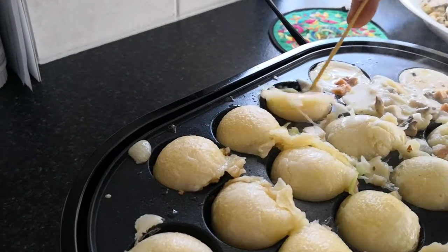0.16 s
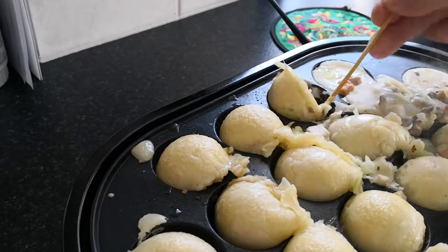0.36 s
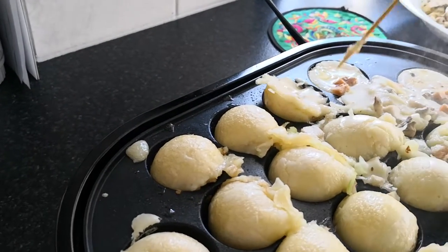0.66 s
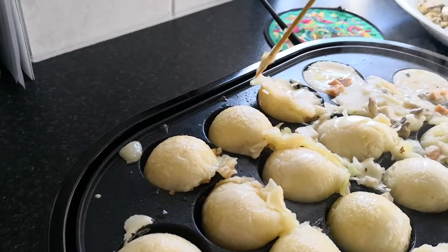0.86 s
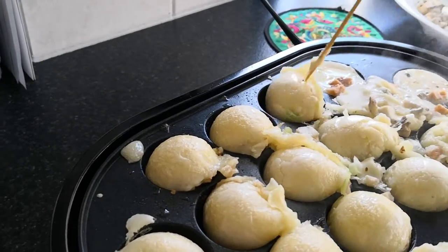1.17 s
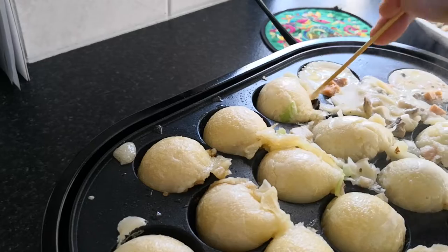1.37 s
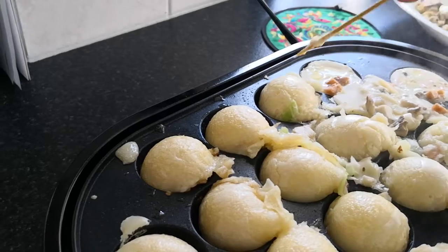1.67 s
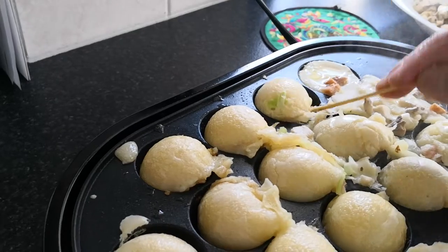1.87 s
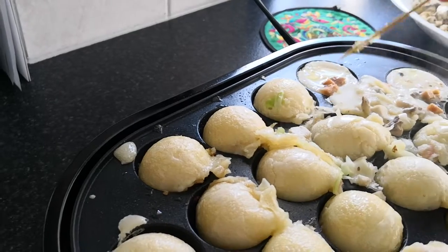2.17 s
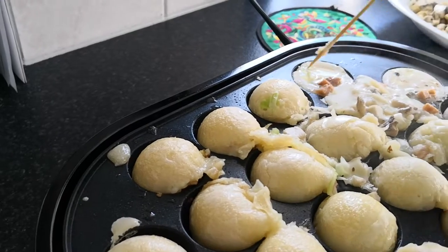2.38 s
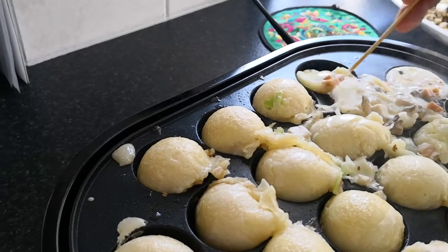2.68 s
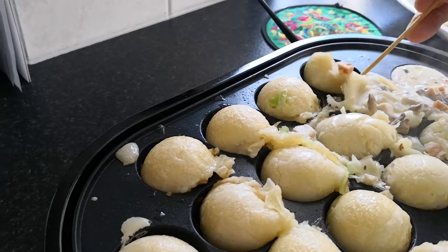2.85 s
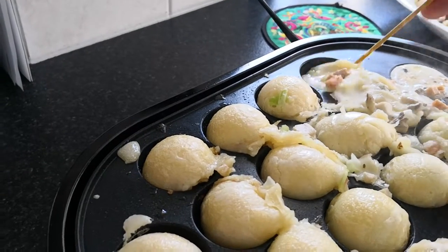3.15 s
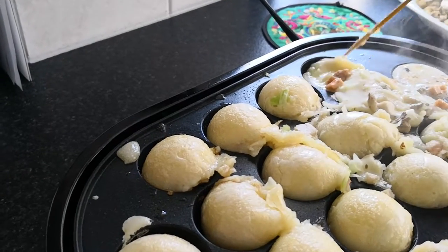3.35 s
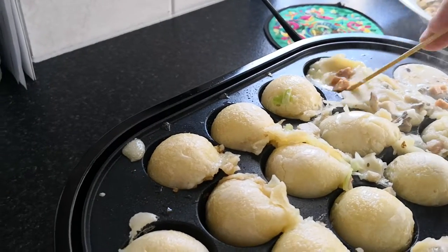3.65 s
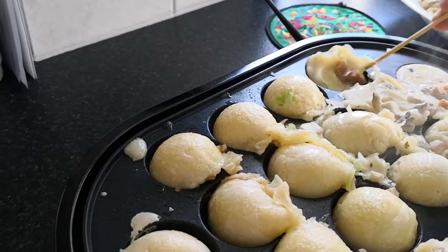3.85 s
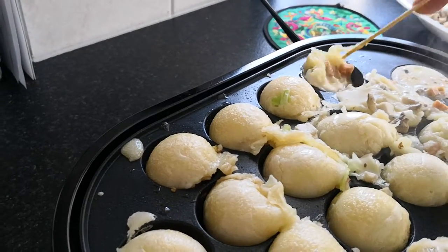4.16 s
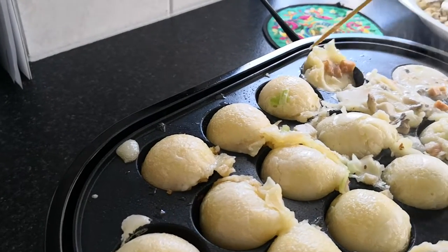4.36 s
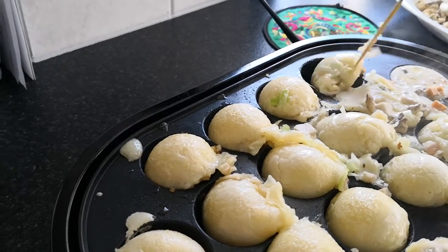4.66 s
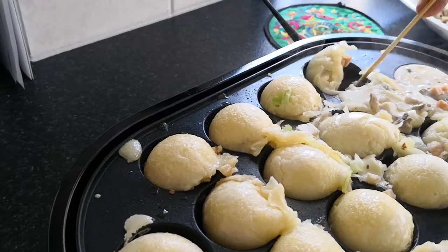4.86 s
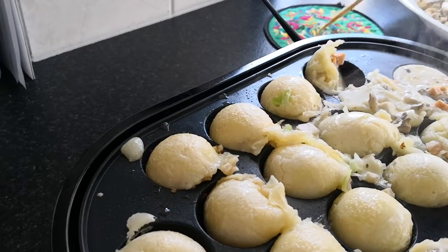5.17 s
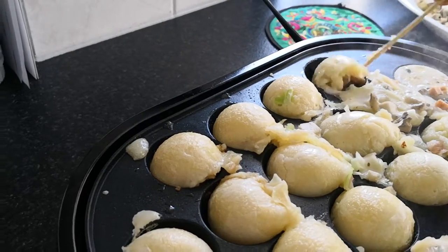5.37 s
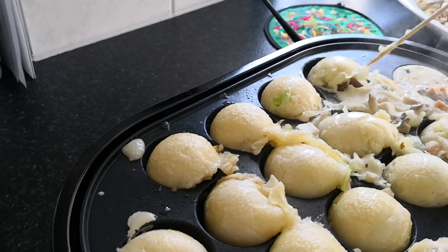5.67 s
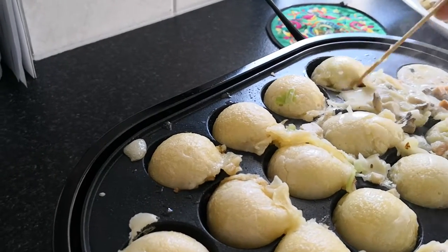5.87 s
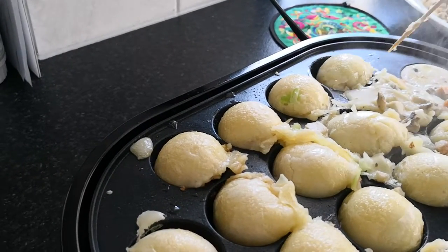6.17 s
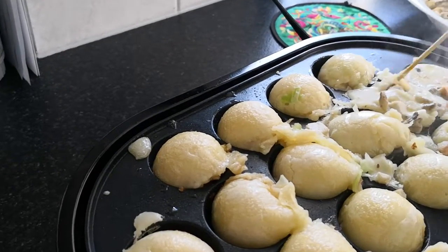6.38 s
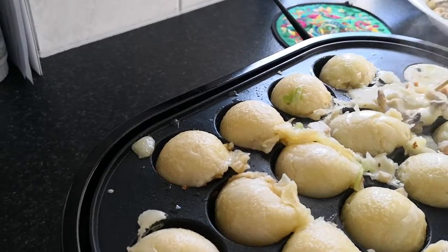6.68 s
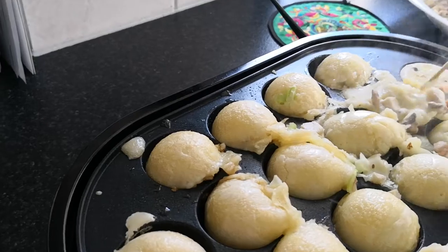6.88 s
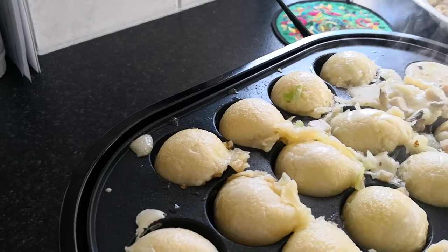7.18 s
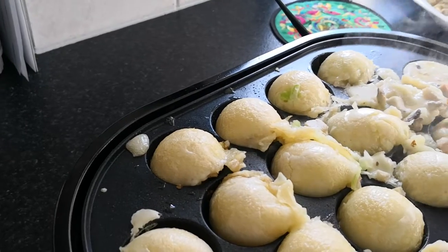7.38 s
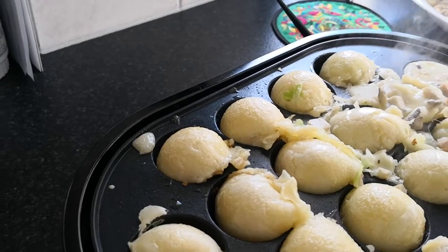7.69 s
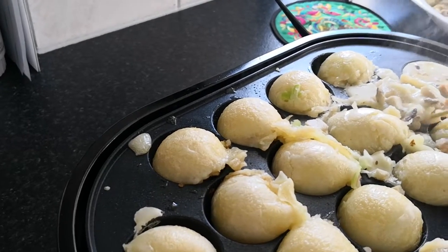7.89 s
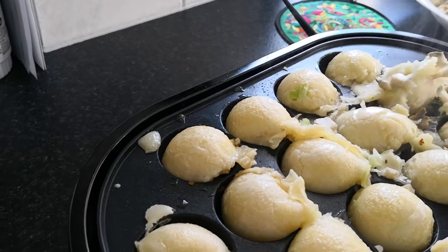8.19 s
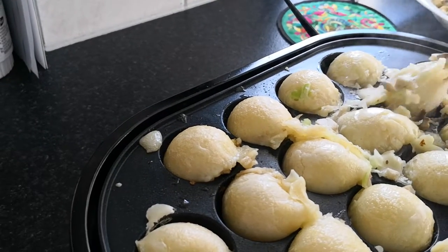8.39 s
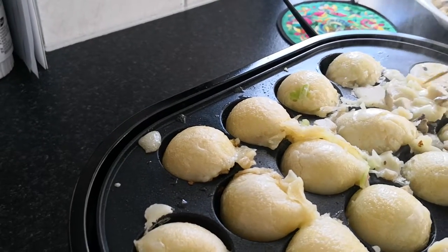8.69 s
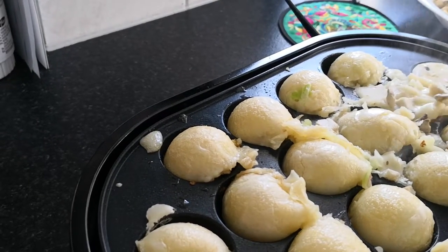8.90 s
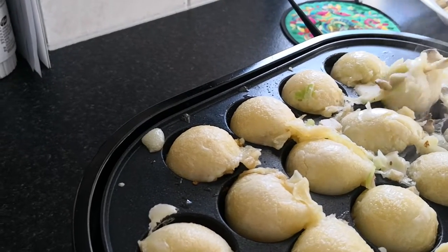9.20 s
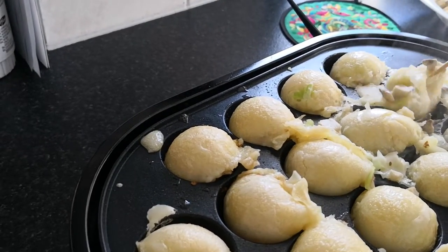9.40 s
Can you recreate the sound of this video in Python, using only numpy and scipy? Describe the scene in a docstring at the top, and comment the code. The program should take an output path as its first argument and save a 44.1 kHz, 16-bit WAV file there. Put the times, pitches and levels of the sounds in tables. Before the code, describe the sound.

A close stereo take of frying dough balls, slightly to the right: a steady hiss of fat, irregular crackling, and short pops, some bright and ticking, others duller. The sizzle flares and sinks in quick swells, with an especially wet flare just before seven seconds. Short hard room echoes surround it. Underneath, soft low vehicle rumble and wavering engine drones grow late on.

```python
"""A small hard kitchen: batter fries in the hollows of a hot iron plate, close by and a little to the right
of a small two-port microphone. Bubbles bursting in the fat are rung clicks: a dense fizz and a looser crackle.
Single pops are short swings with a bell-shaped spectrum. Random echoes make the room.
From outside come traffic, as three bands of filtered noise, and engine drones, as wavering sines."""
import sys
import numpy as np
from scipy import signal
from scipy.fft import rfft, irfft
from scipy.io import wavfile

SR = 44100
rng = np.random.default_rng(int(sys.argv[2]) if len(sys.argv) > 2 else 0)


def persist_wave(psi):
    """Save psi, clipped to +-1, as 16-bit WAV."""
    counts = np.round(np.clip(psi, -1, 1) * 32767).astype(np.int16)
    wavfile.write(sys.argv[1], SR, np.atleast_2d(counts).T)


def undo_db(level):
    """Turn decibels back into plain size, where 20 dB means ten times bigger."""
    steps = np.asarray(level, float) / 20
    return 10 ** steps


N = 420713   # samples
LEFT_LAG_S, LAG_SPREAD_S = .00008, .00006   # the left port is farther from the plate


def rms_one(x):
    """Scale to rms 1."""
    return x / np.sqrt(np.mean(x ** 2) + 1e-20)


def in_time(rows):
    """Columns of a curve at every sample; the first column is time in s."""
    s, *columns = np.transpose(rows)
    return [np.interp(np.arange(N) / SR, s, column) for column in columns]


def at_hz(points, hz, axis=1):
    """A spectrum's dB at given pitches, straight lines over log frequency."""
    points = np.array(points)
    return np.interp(np.log(np.maximum(hz, 1)), np.log(points[:, 0]), points[:, axis])


def drift(rate):
    """Slow random wander of spread about 1: noise through two equal one-pole low-passes, every 40 samples."""
    r = np.exp(-80 * np.pi * rate / SR)
    slow = signal.lfilter([1], [1, -2 * r, r * r], rng.standard_normal(N // 40 + 2002))[2000:]
    return np.interp(np.arange(N) / 40, np.arange(len(slow)), rms_one(slow - slow.mean()))


def causal(points, axis=1, size=8192):
    """Minimum-phase impulse response of a spectrum, by folding its cepstrum."""
    hz = np.arange(size // 2 + 1) * SR / size
    cepstrum = irfft(np.log(undo_db(at_hz(points, hz, axis=axis))))
    cepstrum[1:size // 2] *= 2
    cepstrum[size // 2 + 1:] = 0
    return irfft(np.exp(rfft(cepstrum)))[:size // 2]


def convolve(x, responses):
    """Each channel through its own response."""
    return signal.oaconvolve(x, responses, axes=-1)[..., :N]


# Vigour of the steady frying, before the trims in frying(): start_s [s], large_bubbles_db [dB], small_bubbles_db [dB]
SIMMER = [(0, -50, -50.5), (2.3, -49, -51), (3.7, -50.5, -51.5), (6.2, -49, -51.5), (8, -50, -51),
          (9.54, -49, -50)]
# Wet batter meets hot iron and the fizz surges:
# crest_s [s], length_s [s, nominal], large_bubbles_lift_db [dB], small_bubbles_lift_db [dB]
SURGES = [(0.003, .15, 2.5, 3), (0.44, .3, 4, 7), (1.323, .55, 3, 8.5), (1.921, .25, 1, 7),
          (2.07, 0.19, 5, 0), (2.309, .18, 0, 4.5), (2.851, .35, 2.5, 3.5), (3.329, .4, 0, 2),
          (4.033, .35, -0.5, 5), (4.736, 0.136, 5, 5), (5.05, .3, -1, 3), (5.52, .35, 1, 5),
          (5.923, .2, 1.5, 2), (6.522, .18, 0, 3.5), (6.84, .3, 7, 8), (7.502, .5, 1, 4),
          (8.022, 0.2497, 1.5, .5), (8.25, .3, -0.5, 3.5), (8.52, .4, 1.5, 3), (9.261, .3, 0.5, 4),
          (9.53, .15, 0, 3)]
SURGE_RISE_SHARE, SURGE_ROUNDNESS = .55, 1.5   # share of the length spent rising; 1 = pointed crest, 2 = round


def vigour():
    """Levels in dB of large and small bubbles: steady frying, lifted by surges that rise to a crest and sink."""
    levels, t = np.array(in_time(SIMMER)), np.arange(N) / SR
    for crest_s, length_s, large_db, small_db in SURGES:
        first = max(round((crest_s - 2 * length_s) * SR), 0)
        near = slice(first, round((crest_s + 2 * length_s) * SR))
        share = np.where(t[near] < crest_s, SURGE_RISE_SHARE, 1 - SURGE_RISE_SHARE)
        away = np.abs(1.5 * (t[near] - crest_s) / (length_s * share))
        levels[:, near] += np.exp(-away ** SURGE_ROUNDNESS) * [[large_db], [small_db]]
    return levels


def bursts(per_s, spread_db, cycles, clump_db, low_hz, high_hz, count=12, largest=2.4):
    """Bubbles burst at random places on the plate, each ringing 60 dB down in some cycles; rms 1 in all."""
    rate = per_s * undo_db(clump_db * drift(30.0))   # bursts come in clumps
    at = np.flatnonzero(rng.random(N - 64) < rate[64:] / SR) + 16
    size, place, pitch, sign = rng.random((4, len(at)))
    # exponential sizes in dB, capped at the largest, of either polarity
    size = undo_db(spread_db * np.minimum(-np.log(size + 1e-9), largest)) * np.sign(sign - .5)
    place = 2 * place - 1   # -1..1 across the plate; sets lag and side
    lag = np.clip(np.round((LEFT_LAG_S + 1.7 * LAG_SPREAD_S * place) * SR), -15, 30).astype(int)
    out = np.zeros((2, N))
    for k, hz in enumerate(np.geomspace(low_hz, high_hz, count)):
        mine = (pitch * count).astype(int) == k
        clicks = np.full((2, N), 1e-18)
        np.add.at(clicks[0], (at + lag)[mine], (size * undo_db(-1.5 * place))[mine])
        np.add.at(clicks[1], at[mine], (size * undo_db(3.7 * place))[mine])
        r, w = undo_db(-60 * hz / (cycles * SR)), 2 * np.pi * hz / SR
        ringing = signal.lfilter([hz, 0, -hz], [1, -2 * r * np.cos(w), r * r], clicks)
        out += ringing * np.sqrt(hz)
    return rms_one(out)


def frying():
    """Large bubbles sound low, small ones high; each has a dense fizz and a crackle that thickens in a surge."""
    large_db, small_db = vigour()
    surge_db = small_db - np.median(small_db)
    large_surge_db = large_db - np.median(large_db)

    large_fizz = bursts(4000., 1.7, 2.52, 2.5, 690, 2930)
    large_crackle = bursts(200. * undo_db(surge_db), 6.3, 4.5, 4.0, 1020, 4400)
    small_fizz = bursts(6000., 5.6, 5.4, 2.5, 2800, 10200)
    small_crackle = bursts(260. * undo_db(surge_db), 14.0, 4.0, 4.0, 2800, 13000)
    # the finest spray follows a surge only in part
    finest = bursts(6000., 2.9, 5.3, 2.5, 7500, 12000, count=6)
    # wet batter adds middle-sized bubbles, mostly in a surge
    wet = bursts(3000., 3.7, 5.6, 2.5, 2900, 4700, count=4)
    # steam blows out from under a turned ball and rings in the hollow
    gurgle = bursts(300., 3.8, 8.3, 3.0, 1430, 2290, count=5)

    large = large_fizz + undo_db(-4.5 - 0.27 * surge_db) * large_crackle
    large = large + undo_db(-16.0 + 1.85 * large_surge_db) * gurgle
    small = small_fizz + undo_db(-7.0 - 2.3 * surge_db) * small_crackle
    small = small + undo_db(-.4 * surge_db) * finest + undo_db(-12.5 + 1.9 * surge_db) * wet
    return undo_db(large_db - 2.5) * large + undo_db(small_db - 3.5) * small


# Traffic outside: start_s [s], deep_rumble_db [dB rms], middle_db [dB rms]
TRAFFIC = [(0.0, -59, -59.5), (0.8, -62.5, -54.5), (1.15, -67, -58.5), (1.8, -56.5, -54.5),
           (2.54, -71, -59), (3.49, -56, -54), (3.79, -63, -56.5), (4.29, -59, -54.5), (5.09, -62.5, -53.5),
           (5.64, -60, -54.5), (6.63, -59.5, -58), (8.25, -52.5, -51.5), (8.4, -47, -44.5),
           (8.58, -44, -47), (8.75, -62, -52.5), (9.25, -55, -52), (9.53, -47.5, -48)]
# Colour of the rumble, before its bands are levelled: pitch_hz [Hz], density_db [dB per Hz, relative]
RUMBLE = [(15, -60), (25, -7.5), (44, -4.5), (107, -3.5), (140, -2.5), (220, -13.5), (301, -12.5),
          (366, -18), (549, -27), (900, -18.5), (1170, -30), (1980, -120)]
UPPER_DB, UPPER_FOLLOWS = -65.5, 0.33   # the upper rumble shares part of the middle's swing


def traffic():
    """Rumble through the walls, alike at both ports only in the bass; three bands swell as vehicles pass."""
    mid, side = convolve(rng.standard_normal((2, N)), causal(RUMBLE, size=16384)[None])
    high_pass = signal.butter(2, 520., "high", fs=SR, output="sos")
    side = signal.sosfilt(high_pass, side) + undo_db(-12.5) * side
    both = mid + side * [[1], [-1]]
    deep_db, middle_db = in_time(TRAFFIC)
    upper_db = UPPER_DB + UPPER_FOLLOWS * (middle_db - middle_db.mean())
    out = 0
    for db, hz, kind in [(deep_db, 125., "low"), (middle_db, [125., 240.], "band"), (upper_db, 240., "high")]:
        band = signal.sosfilt(signal.butter(3, hz, kind, fs=SR, output="sos"), both)
        out = out + undo_db(db) * rms_one(band)
    return out


def drone(rows, orders, waver_db):
    """Sines on multiples of a wavering pitch, fading to -90 dB before and after the (s, Hz, dB) rows."""
    (first_s, first_hz, _), (last_s, last_hz, _) = rows[0], rows[-1]
    hz, level_db = in_time([(first_s - .15, first_hz, -90), *rows, (last_s + .15, last_hz, -90)])
    turns = np.cumsum(hz + .5 * drift(3.43)) / SR
    out = 0
    for multiple, db in orders:
        sine = np.sin(2 * np.pi * (multiple * turns + rng.random()))
        out = out + undo_db(level_db + db + waver_db * drift(7.3)) * np.sqrt(2) * sine
    return out


# Near engine, its level: start_s [s], level_db [dB rms, before the waver]
ENGINE = [(0.0, -53), (0.35, -54), (0.5, -64), (0.97, -62), (1.4, -45.5), (1.6, -59), (1.8, -52.5),
          (2.241, -52.5), (2.44, -65), (4.99, -68), (5.41, -58.5), (6.61, -60.5), (6.78, -49.5),
          (7.23, -43), (7.76, -48), (8.11, -60), (8.41, -44), (8.579, -42.5), (9.03, -39), (9.53, -49.5)]
# Its firing pitch, lower by the end: start_s [s], pitch_hz [Hz]
ENGINE_HZ = [(0, 60.56), (.8, 59.3), (2.4, 58.87), (4.2, 56.95), (7.8, 57.58), (9.54, 54.7)]
# Its harmonics: multiple [of the firing pitch], level_db [dB against the first]
ENGINE_ORDERS = [(1, 0), (2, -27.5), (3, -17.5)]


def near_engine():
    """The firing pitch and its harmonics, read at the times of the level rows."""
    rows = [(s, np.interp(s, *np.transpose(ENGINE_HZ)), db) for s, db in ENGINE]
    return drone(rows, ENGINE_ORDERS, waver_db=1.0)


# Far drones, one list of rows each: start_s [s], pitch_hz [Hz, sounded at 0.99 of it],
# level_db [dB rms, sounded 4 dB lower]
DRONES = [
    [(.6, 180.9, -55.5), (1.27, 181.6, -58.5), (2.56, 171.8, -59.5), (3, 167.4, -58)],
    [(0, 136.3, -83), (2.6, 138, -68), (4.3, 136.2, -58), (5, 127.3, -76), (5.77, 125.7, -58),
     (6.7, 134, -53.5), (7.2, 145, -62), (7.6, 147.4, -55)],
    [(0, 243.3, -66.5), (6.6, 243.2, -71), (8, 238.4, -78), (9.54, 241.5, -58)],
    [(7.8, 44.64, -58), (8.2, 41, -49), (8.8, 41.9, -50), (9.54, 38, -54)],
    [(7.8, 180, -57), (8.33, 197.3, -49), (8.75, 212, -61), (9.23, 203.8, -55.5), (9.54, 203.5, -46.5)],
]


def far_engines():
    """Each far drone is a single wavering sine."""
    return sum(drone(rows, [(0.99, -4.0)], waver_db=-0.5) for rows in DRONES)


# Colour of plate, body and port at each microphone: pitch_hz [Hz], left_db [dB], right_db [dB]
PORTS = [(302, -47.5, -16.5), (618, -6, -5), (970, 0, -1.5), (1356, -0.5, -1), (1686, 1.5, 5), (2650, 3, 2),
         (2790, -1, 1.5), (4260, -5, -3.5), (5920, -3, 1.5), (6300, -4.5, 0), (7640, -3.5, 8.5),
         (8460, -7.5, -3.5), (9140, -0.5, -6), (10090, -2.5, -16), (13000, -19, -13.5), (15300, -8.5, -15)]


def ports():
    """Impulse responses of the left and right port."""
    return np.array([causal(PORTS, axis=1), causal(PORTS, axis=2)])


# Single pops: start_s [s, time of the swing], peak_db [dB, mean of both ports before the echoes],
# pitch_hz [Hz], snap_db [dB, bright snap of the skin against the bell]
POPS = [(0.074, -28.5, 6570, -14.5), (0.2246, -28, 1654, -30.5), (0.3913, -25.5, 3300, -15),
        (0.449, -35, 3260, -14), (0.5087, -25.5, 6800, -13), (0.632, -26, 6700, -11),
        (0.643, -32, 2300, -18), (0.685, -28.5, 6230, -15), (0.937, -29, 3070, -14),
        (0.942, -19, 2900, -13), (1.189, -28, 6500, -9), (1.196, -30, 6450, -12), (1.235, -27, 8500, -3),
        (1.266, -25.5, 3950, -17), (1.27, -31, 4500, -18), (1.3172, -23, 6600, -17),
        (1.326, -28.5, 6300, -13), (1.3578, -31, 4174, -16), (1.4471, -21.5, 5740, -22),
        (1.4697, -20, 6600, -15.5), (1.5818, -27, 8030, 1), (1.696, -30.5, 1920, -9),
        (1.73, -28, 1830, -10), (1.8116, -36, 2010, -12), (1.8219, -29, 8730, -1), (1.917, -28, 6840, -17),
        (1.9747, -28, 6800, -17), (2.0485, -21.5, 2880, -26), (2.0661, -19.5, 2200, -15),
        (2.088, -33, 2110, -28), (2.0975, -23, 2500, -27), (2.1844, -32.5, 6460, -20.5),
        (2.2867, -34, 6000, -16), (2.2939, -30, 5500, -15), (2.31, -31, 2600, -9),
        (2.3555, -30.5, 6800, -14), (2.474, -20, 7000, -3), (2.5195, -23, 4960, -3),
        (2.7576, -27, 8330, -16), (2.9448, -27, 7460, -1), (3.1, -33, 8300, -5), (3.1562, -31, 5800, -9),
        (3.234, -36, 13000, 0), (3.6365, -25.5, 7100, -13), (4.0367, -30, 3280, -23),
        (4.314, -26, 2000, -12), (4.4922, -19, 3080, -20), (4.618, -27, 3600, -7), (4.7115, -38, 2300, -20),
        (4.7253, -32, 3000, -22), (4.73, -35, 6800, -20), (4.756, -28, 2170, -15), (4.98, -30, 8860, -11),
        (5.249, -30.5, 3130, -11), (5.667, -30.5, 2480, -16), (5.876, -29, 6300, -16),
        (5.9592, -26, 3060, -24.5), (5.9878, -35, 2600, -20), (6.181, -25, 2970, -21.5),
        (6.2588, -27, 8110, 0), (6.554, -30.5, 2600, -15), (6.617, -32.5, 6400, -16),
        (6.6891, -27.5, 2513, -15), (6.748, -31, 2300, -10), (6.782, -27, 6230, -15),
        (6.853, -38, 1890, -25), (6.869, -38, 3500, -16), (6.883, -27, 5800, -17),
        (6.8976, -18.5, 6200, -18), (6.904, -33, 2600, -22), (6.9449, -25, 2650, -21),
        (7.1582, -30, 6300, -21), (7.1782, -26, 9250, -15), (7.282, -32, 2500, -20),
        (7.4934, -35, 2300, -20), (7.5143, -28.5, 6610, -11), (7.5627, -33.5, 2200, -20),
        (7.6428, -31, 2224, -20), (7.892, -17.5, 6350, -15), (7.9196, -31, 6200, -22.5),
        (7.9578, -35, 2200, -22), (7.9889, -22, 2500, -9), (8.0043, -27, 5870, -23),
        (8.0739, -20.5, 2980, -15), (8.1216, -28, 2480, -13), (8.2462, -32, 6300, -18),
        (8.2908, -26.5, 6500, -14), (8.3995, -25, 3700, -12), (8.4563, -27.5, 2880, -13),
        (8.492, -27.5, 6220, -10), (8.506, -23, 3100, -22), (8.512, -31, 2890, -15),
        (8.6138, -31, 6600, -14), (8.629, -22.5, 3020, -26), (8.752, -26.5, 3030, -2),
        (8.844, -25, 6360, -9), (8.8608, -34.5, 2200, -20), (8.9118, -26, 6600, -13),
        (9.021, -27.5, 3084, -10), (9.0533, -25, 2840, -28), (9.1252, -26.5, 6000, -16),
        (9.2339, -27, 6180, -22), (9.281, -30, 6620, -16), (9.2908, -31, 6800, -10),
        (9.353, -33, 2300, -20), (9.3827, -28, 2810, -27), (9.4387, -32.5, 2200, -14),
        (9.472, -25.5, 6160, -13), (9.4906, -26, 6300, -17.5), (9.5039, -27.5, 6520, -16)]
POP_WIDTH_HZ = 930      # nominal width; a pop lasts about as long at any pitch
SNAP_WIDENS = 0.045     # octaves of extra spread per dB of snap above -16
RAGGED_DB = 2           # unevenness of each pop's spectrum


def pops(size=512):
    """Each pop is a short swing with a ragged bell-shaped spectrum; the torn skin adds a bright snap."""
    out = np.zeros((2, N + size))
    hz = np.maximum(np.arange(size // 2 + 1) * SR / size, 1)
    heard = rfft(ports()[:, :size])
    chance = rng.standard_normal((len(POPS), 26))
    for (start_s, peak_db, pitch, snap_db), (place, phase, *ragged) in zip(POPS, chance):
        octaves = np.log2(1 + POP_WIDTH_HZ / pitch) + SNAP_WIDENS * max(snap_db + 16.0, 0)
        away = np.abs(np.log2(hz / pitch)) / (1.86 * max(octaves, .1))
        # a dull body trails below the pitch
        bell = np.exp(-np.where(hz < pitch, away ** 1.13, (1.3 * away) ** 2))
        snap = undo_db(snap_db) / (1 + (max(6500., 1.5 * pitch) / hz) ** 4) / (1 + (hz / 18000.0) ** 4)
        unevenness = np.interp(hz, np.linspace(0, SR / 2, len(ragged)), ragged)
        spectrum = (bell + snap) * undo_db(RAGGED_DB * unevenness)
        # the place on the plate sets lag and side
        lag = np.array([[LEFT_LAG_S + 0.99 * LAG_SPREAD_S * place], [0]])
        balance = undo_db((1.0 + 3.1 * place) * np.array([[-.5], [.5]]))
        ears = spectrum * balance * np.exp(1j * (1.9 * phase - 2 * np.pi * hz * (lag - .00025)))
        peak = np.abs(irfft((ears * heard).mean(0))).max()   # of both ports together
        i = max(round(start_s * SR) - size // 2, 0)
        out[:, i:i + size] += undo_db(peak_db) / peak * np.roll(irfft(ears), size // 2, axis=1)
    return out[:, :N]


KITCHEN_T60_S, KITCHEN_DB = 0.41, -8.5   # the room's tail, level against the direct sound
NEAR_T60_S, NEAR_DB = 0.013, -10         # quick echoes


def kitchen(x, count=8):
    """Quick echoes from plate, balls and counter, then the room's tail, as decaying noise.
    Each block of 1024 samples draws one of eight random echo sets, so no fixed colour builds up."""
    t = np.arange(round(.3 * SR)) / SR
    echo_set = np.repeat(rng.integers(0, count, N // 1024 + 1), 1024)[:N]
    out = x.copy()
    for k in range(count):
        near, far = rng.standard_normal((2, 2, len(t))) * (t > .0012)
        near = near * undo_db(-60 * t / NEAR_T60_S)
        far = far * undo_db(-60 * t / KITCHEN_T60_S)
        near, far = [e / np.sqrt(np.sum(e ** 2, -1, keepdims=True)) for e in (near, far)]
        out += convolve(x * (echo_set == k), undo_db(NEAR_DB) * near + undo_db(KITCHEN_DB) * far)
    return out


def scene():
    """The plate in its kitchen, through the ports, with the street outside."""
    plate = convolve(kitchen(frying() + pops()), ports())
    return plate + traffic() + near_engine() + far_engines()


def top_cut(x):
    """Nothing passes above the cut-off."""
    return signal.sosfilt(signal.butter(12, 16470, fs=SR, output="sos"), x)


SELF_NOISE_DB = -67   # rms at each capsule


def record(dry):
    """Each capsule adds its own faint hiss; a steep low-pass takes off the highest treble."""
    hissing = dry + undo_db(SELF_NOISE_DB) * rng.standard_normal((2, N))
    low_pass = signal.cheby2(12, 30.0, 15600., fs=SR, output="sos")
    return top_cut(signal.sosfilt(low_pass, hissing))


dry = scene()
out = record(dry)
persist_wave(out)
```